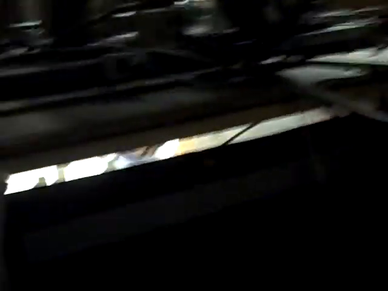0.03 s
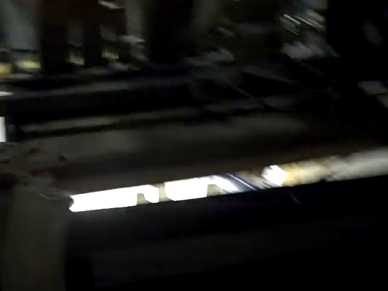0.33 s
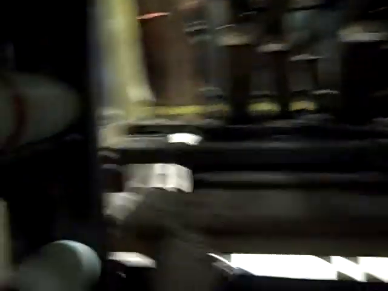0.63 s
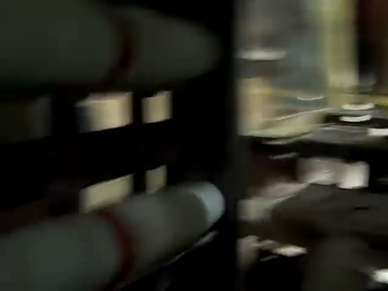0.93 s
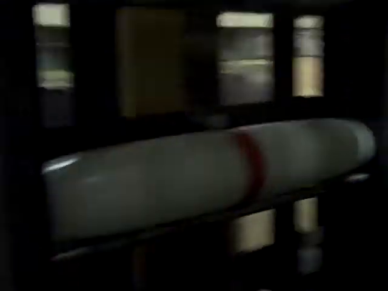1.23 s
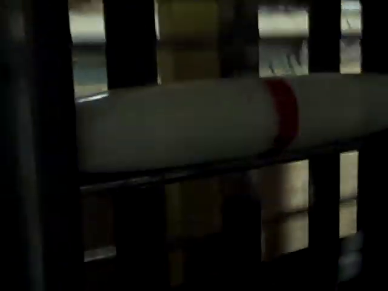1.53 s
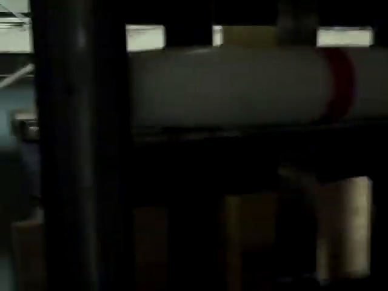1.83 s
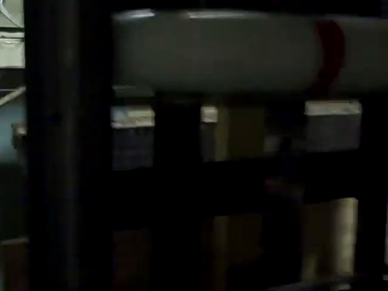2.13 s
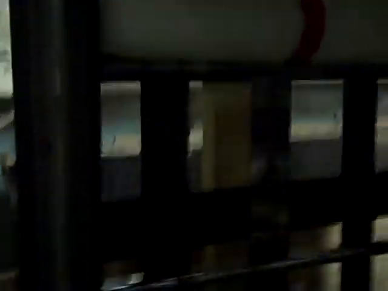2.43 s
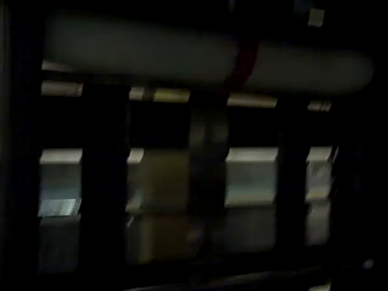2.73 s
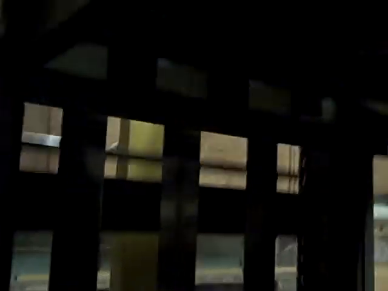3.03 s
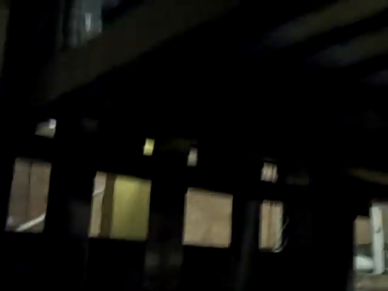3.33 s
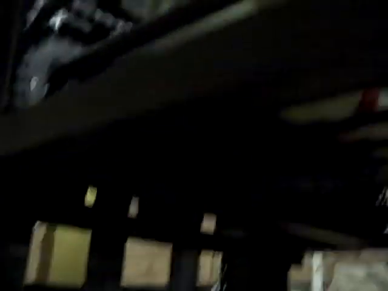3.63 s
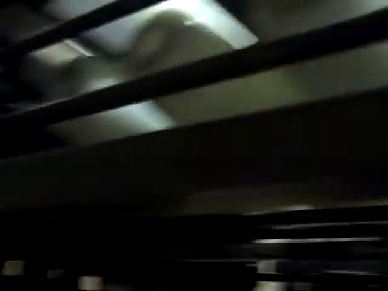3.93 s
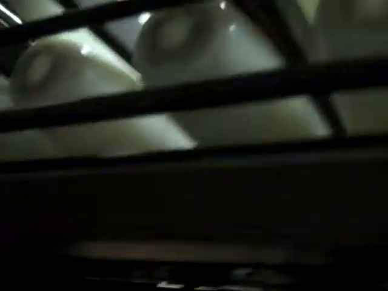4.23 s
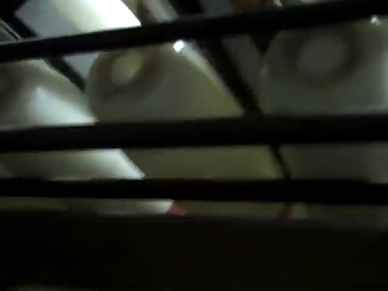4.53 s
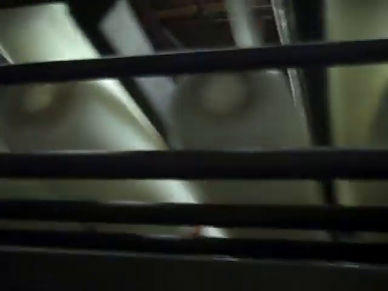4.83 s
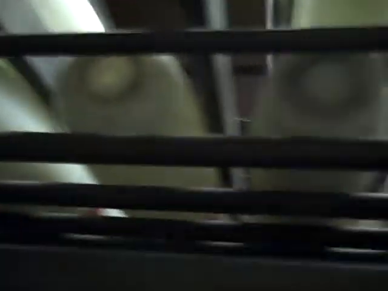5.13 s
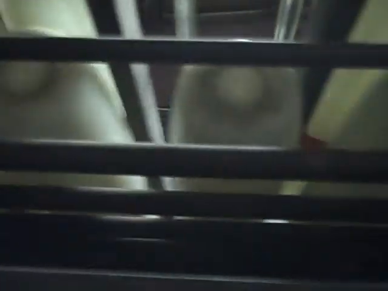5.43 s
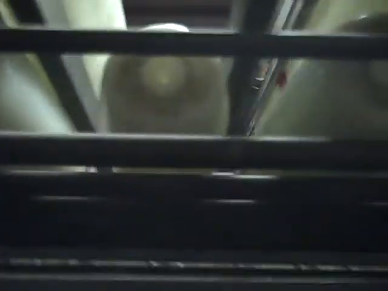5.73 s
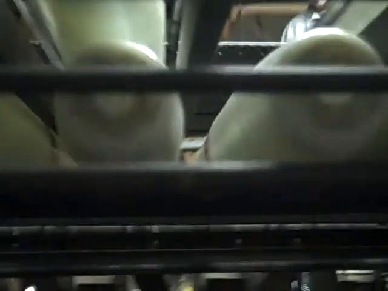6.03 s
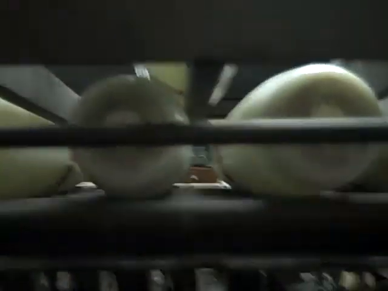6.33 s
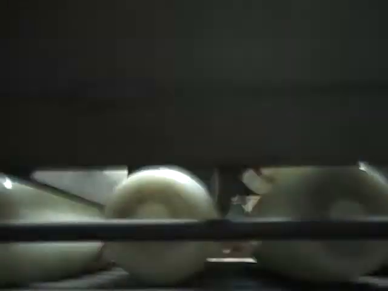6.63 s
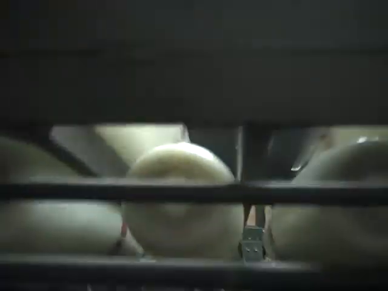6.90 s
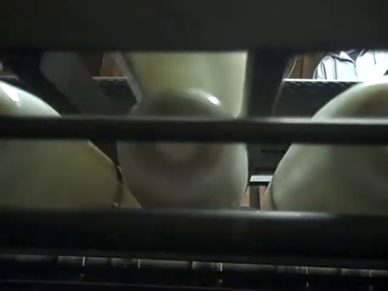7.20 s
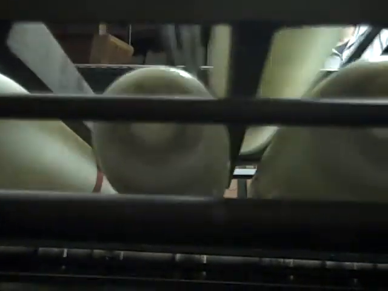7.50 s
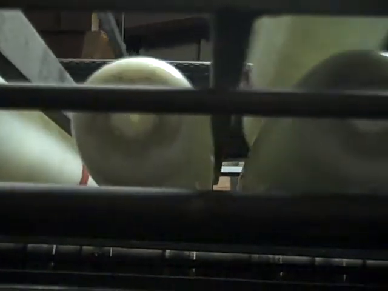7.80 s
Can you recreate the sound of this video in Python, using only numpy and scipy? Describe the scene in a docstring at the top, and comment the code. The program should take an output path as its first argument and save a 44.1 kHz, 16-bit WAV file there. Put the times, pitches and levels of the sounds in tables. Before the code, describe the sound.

A bowling pinsetter runs, heard close up from inside its housing. Over a steady motor hum and conveyor rumble, pins drop off a belt about twice a second with hard, hollow clatters, then bump and scrape down chutes and knock together. Chains and linkages rattle and click throughout. Three times, near the start, middle and end, a steel part slams with a brief ring.

```python
"""Inside a bowling pinsetter

The microphone sits in the running machine, over motor hum and conveyor rumble. About twice a second a
pin drops off the belt and clatters; between drops, pins bump down their chutes. Loose pins collide,
chains and linkages rattle, and three times a steel part slams and rings. The housing scatters the
blows, and fainter knocks come from deeper inside."""
import sys
import numpy as np
from scipy import signal
from scipy.fft import rfft, irfft, next_fast_len
from scipy.io import wavfile
from scipy.ndimage import uniform_filter1d, map_coordinates

SR = 44100
rng = np.random.default_rng(int(sys.argv[2]) if len(sys.argv) > 2 else 0)


def generate_wav(sig):
    """Save sig (samples, or channels by samples) to the path in sys.argv[1] as 16-bit PCM at SR."""
    pcm = np.round(np.clip(np.atleast_2d(sig).T, -1, 1) * 32767).astype(np.int16)
    wavfile.write(sys.argv[1], SR, pcm)


N = 355446

# steady hum: (time [s], relative level [dB])
HUM_LEVEL = [(0, -54), (.9, -51), (2.3, -48.5), (3.2, -48.5), (5.1, -49.5), (5.8, -53), (8.06, -54)]
# three motor tones, then a pin resonance near 629 Hz: (frequency [Hz], relative level [dB])
HUM_TONES = [(297, -24), (327, -6.5), (594, 4), (629, 2)]
# load on the belt: (time [s], relative level of rolling pins [dB], relative level of rumble [dB])
BELT_LOAD = [(0.0, -34.5, -48), (0.65, -37.5, -43.5), (0.83, -44, -47), (2.58, -35.5, -45),
             (2.78, -37, -42), (3.46, -37, -45), (3.57, -41, -48), (4.4, -41.5, -43.5), (4.51, -34, -45),
             (5.68, -44, -43.5), (6.53, -39.5, -46.5), (6.64, -36, -44), (6.96, -38, -44),
             (8.06, -39, -46.5)]
# the chain, which slackens after each slam: (time [s], relative level [dB])
CHAIN_EFFORT = [(0.0, -36.5), (0.47, -35.5), (0.72, -46), (1.32, -44), (1.48, -39.5), (1.82, -41),
                (2.36, -38), (2.83, -42), (3.25, -40), (3.46, -51.5), (3.93, -48.5), (4.71, -38.5),
                (5.16, -43.5), (6.02, -39), (6.46, -41.5), (7.59, -39.5), (7.81, -45.5), (8.06, -47.5)]
# reverberation of the housing: (frequency [Hz], t60 [s])
HOUSING_DECAY = [(100, 0.067), (600, 0.57), (1450, 0.55), (2400, 0.2), (4000, 0.48), (12000, 0.18)]

# noise colours of the running parts and of blows: (frequency [Hz], relative density [dB])
FRAME_RUMBLE = [(15, -68), (25, -38), (37, -82), (117, -19.5), (221, -15), (262, -5.5), (364, -6),
                (433, -9), (468, -6), (556, -11), (589, -3.5), (743, -10), (936, -8), (1230, -11.5),
                (2500, -48), (3250, -46), (5500, -120)]
FRAME_THUD = [(15, 0.5), (60, -9), (120, -8.5), (200, -9.5), (500, -9), (1200, -31), (4000, -80)]
CHAIN_HISS = [(800, -34), (1600, 3.5), (2800, 4), (4000, 1.5), (6000, -1.5), (8000, -4.5), (10000, -5.5),
              (12500, -13), (16000, -20.5)]
LINK_CLICK = [(1500, -16), (3000, -1), (5000, 0), (7000, -1.5), (10000, -2), (12500, -9), (14500, -14.5),
              (16000, -20)]
SHEET_CLANK = [(30, -36), (100, -18), (350, -3), (900, -2), (1700, 0), (2800, 0), (4000, -5), (7000, -14),
               (11000, -20), (16000, -34)]
PIN_ROLL = [(300, -53), (520, -12), (660, 3.5), (900, 1.5), (1150, -0.5), (1430, 5.5), (1750, -4.5),
            (2300, -0.5), (3200, -44)]
PIN_SCRAPE = [(250, -20), (500, 3.5), (660, 2.5), (850, 6), (1050, 9), (1450, -5.5), (1800, -3.5),
              (2300, -7), (3500, -22.5)]
PIN_CRACK = [(150, -28), (500, 1), (1500, 9.5), (3200, 6.5), (4500, -0.5), (6500, -11), (10000, -15),
             (16000, -27)]

# modes of a link, a guide rod, the steel part and a pin: (frequency [Hz], relative level [dB], t60 [s])
LINK_MODES = [(2710, 3, 0.07), (3540, -15, 0.048), (4380, -4, .03), (5160, -14, .06), (7800, -20, .05)]
ROD_MODES = [(7640, -11, 0.11), (8400, 6, .2), (8560, -5, 0.15), (10700, 1, .18), (12950, -12, .18)]
STEEL_MODES = [(2896, -1, .07), (3070, -5, .08), (3450, -3, .11), (4086, -5, .09), (4320, -7, .1),
               (4716, -5, .12), (5416, -5, .13), (6150, -2, .12), (6930, -1, .12), (7755, -7, .17),
               (8640, -9, .13), (9512, -3, .12), (10440, 3, .17), (11410, 8, .14), (12410, 8, .14)]
PIN_BODY_MODES = [(655, -8, 0.05), (712, -9, 0.033), (936, -7, 0.024)]
PIN_CLACK_MODES = [(1135, -15, 0.027), (1350, -6, 0.03), (1443, -2, 0.071), (1613, -5.5, 0.017)]
PIN_UPPER_MODES = [(1907, -6.5, 0.026), (2170, 2, 0.022), (2310, 3, 0.045), (2500, -12, 0.023)]

# the loudest chain and linkage clicks: (time [s], relative level [dB], clank offset [dB])
LOUD_CLICKS = [(0.0623, -18.5, -3.5), (0.1232, -21.5, -5), (0.2263, -20.5, 0.5), (0.2668, -17.5, -16),
               (0.295, -21.5, -3.5), (.3322, -21, -9), (.374, -19.5, -7), (0.4024, -18.5, -9),
               (1.295, -28.5, 3), (1.3492, -23, -3), (1.3982, -20.5, -1), (1.4703, -19.5, -2),
               (2.4947, -18.5, -3.5), (2.5636, -20.5, -7), (2.9996, -24, -5), (3.5874, -30, -11),
               (3.6632, -32, -6), (4.5329, -30.5, 4.5), (4.6764, -23, -2), (5.7666, -26.5, 3.5),
               (5.8422, -23.5, -2), (5.901, -26.5, 1), (6.0642, -25, 3), (6.2497, -25, -8),
               (6.4698, -21, -17), (6.9305, -27, -10), (7.4384, -20.5, -5.5), (7.4889, -25, -6),
               (7.6006, -19, -9), (7.645, -21, 2)]
# loose links chinking: (time [s], relative level [dB])
LINK_CHINKS = [(.297, -25.5), (.376, -27.5), (.418, -29), (2.496, -24), (3.589, -37), (4.679, -27),
               (5.77, -30.5), (7.442, -33), (7.492, -37)]
# the steel part slams and bounces, or a pin clips it: (time [s], relative level [dB], ring offset [dB])
STEEL_SLAMS = [(0.5964, -16.5, -6), (0.6025, -20, -1), (0.6208, -22.5, -7), (3.3168, -23, -2),
               (3.3346, -27, -11), (3.3407, -13.5, -5.5), (4.365, -28.5, -6), (5.6898, -33, -9),
               (7.6664, -15, -14), (7.6807, -16, -9.5)]
# pins grazing thin guide rods: (time [s], relative level [dB])
ROD_TINGS = [(4.064, -41), (5.166, -41), (5.412, -40), (5.446, -39), (5.518, -39), (5.69, -40),
             (5.972, -39)]
# jolts of the frame: (time [s], relative level [dB])
FRAME_JOLTS = [(0.297, -57), (0.603, -40), (1.402, -50), (2.497, -41), (2.596, -44), (3.341, -29.5),
               (7.682, -29)]
# pins going down a chute, levels relative: (middle [s], bump [dB], scrape [dB], half length [s])
CHUTE_SLIDES = [(0.756, -25, -35, 0.042), (1.336, -30, -38, .06), (1.862, -23.5, -37, 0.035),
                (2.422, -34, -40, 0.033), (4.0622, -18, -50, 0.047), (4.62, -20, -32.5, 0.021),
                (5.1584, -17, -35.5, 0.098), (5.6795, -13, -34, 0.059), (6.234, -13.5, -32.5, 0.051),
                (6.7523, -14.5, -35, 0.051), (7.3117, -16, -30.5, 0.056)]
# loose pins colliding: (time [s], relative level [dB], body offset [dB], hardness [dB])
PIN_COLLISIONS = [(.0034, -18.5, -13, 3), (.2423, -17.5, -16, -15), (0.596, -10.5, -9, 4.5),
                  (.6094, -6, -26, 2), (0.6821, -17, -18, 0), (2.395, -22.5, -21, -1),
                  (2.595, -4.5, -12.5, -0.5), (2.7875, -5, -22, -11), (2.8114, -21, -2, -9),
                  (3.0009, -20.5, -9.5, 3.5), (3.3037, -8.5, -26, 1), (3.3174, -9.5, -9, 2.5),
                  (3.3335, -6.5, -10.5, 5.5), (3.4358, -15, -17, 1), (3.5337, -22, -14, -8),
                  (3.704, -18, -9, 0), (4.4472, -21.5, -16, 2), (4.583, -12, -10, -5),
                  (4.784, -5.5, -14, -2.5), (5.2014, -23, -22, -5), (5.5149, -24, -9, 4),
                  (6.474, -22, -7, 0), (6.6656, -18, -11, -5), (7.673, -6.5, -11, 3),
                  (8.0293, -15.5, -12.5, 0)]
# a pin lands on one end, then the other, once a cycle; levels relative: (time [s], first contact [dB],
# gap [s], second contact [dB], rebound [dB], body offset [dB], hardness [dB], steel [dB])
PIN_DROPS = [(0.5168, -16, 0.02, -19, -18.5, -10.5, 4.5, -50), (1.0624, -24, 0.012, -13, -42, -13, -5, -55),
             (1.6048, -19, 0.013, -16, -30, -6, 0.5, -55), (2.147, -15, 0.0071, -13, -25, -10, 3, -33),
             (2.6923, -16, 0.0085, -15, -22, -11, 0.5, -50),
             (3.2533, -13.5, .009, -11.5, -15, -11.5, -7, -52),
             (3.8005, -13.5, 0.013, -22, -40, -13, -1, -57),
             (4.2993, -21.5, .011, -10.5, -14.5, -15, 3, -42), (4.8729, -13, 0.018, -7, -31, -12, 3, -46),
             (5.3992, -20, .0113, -16.5, -10.5, -15.5, 8, -34),
             (5.9464, -17.5, 0.021, -13, -22, -8, 6.5, -28),
             (6.5194, -13, 0.0099, -8.5, -18, -19, -0.5, -33),
             (7.0348, -10, .0246, -7.5, -14.5, -14, 3, -42),
             (7.5591, -21, 0.022, -11.5, -14, -14, 0.5, -35)]


def amp(db):
    """Decibels to amplitude."""
    return 10 ** (np.asarray(db) / 20)


def unit(x):
    """Scale to rms 1."""
    return x / np.sqrt(np.mean(x ** 2) + 1e-20)


def crest(x):
    """Scale a blow so that its loudest 4 ms have rms 1."""
    return x / np.sqrt(uniform_filter1d(x ** 2, 176).max() + 1e-20)


def along(points, hz):
    """Interpolate (frequency, value) points on a log axis."""
    knots_hz, values = np.transpose(points)
    return np.interp(np.log(hz + 1), np.log(knots_hz + 1), values)


def curves(rows):
    """One value per sample for each column after the time."""
    times, *columns = np.transpose(rows)
    return [np.interp(np.arange(N) / SR, times, column) for column in columns]


def wobble(rate):
    """A smooth random curve, rate knots a second."""
    knots = rng.standard_normal(int(N * rate / SR) + 4)
    return map_coordinates(knots, [np.arange(N) * rate / SR])


def uneven(gap):
    """A gap that comes out a little long or short."""
    return gap * (1 + .05 * rng.standard_normal())


def noise(spectrum, size):
    """Coloured noise of rms 1."""
    padded = next_fast_len(size)
    colour = amp(along(spectrum, np.fft.rfftfreq(padded, 1 / SR)))
    return unit(irfft(rfft(rng.standard_normal(padded)) * colour, padded)[:size])


def blow_time():
    """The time axis of one blow, 0.3 s long."""
    return np.arange(13230) / SR


def add(track, at, sound):
    """Mix a sound into the track at a time in seconds."""
    start = int(np.clip(round(at * SR), 0, N - 1))
    track[start:start + len(sound)] += sound[:N - start]


def high_pass(x, cut_hz):
    """Small parts radiate no deep bass."""
    return signal.sosfilt(signal.butter(3, cut_hz, "highpass", fs=SR, output="sos"), x)


def ring(modes, scatter_db, pitch=1, detune=0):
    """Damped modes, each struck with a new strength and, with detune, a little out of tune."""
    t = blow_time()
    hz, db, t60 = np.transpose(modes)[:, :, None]
    hz = hz * (pitch + detune * rng.standard_normal(hz.shape))
    gain = amp(db + scatter_db * rng.standard_normal(hz.shape)) * rng.choice([-1, 1], hz.shape)
    return np.sum(gain * amp(-60 * t / t60) * np.sin(2 * np.pi * hz * t), axis=0)


def burst(spectrum, attack, t60, tail_db, tail_t60):
    """A contact too dense in modes to have a pitch: a fast decay plus a slower one."""
    t = blow_time()
    decay = amp(-60 * t / t60) + amp(tail_db - 60 * t / tail_t60)
    return crest(noise(spectrum, len(t)) * (1 - np.exp(-t / attack)) * decay)


def chatter(rate, spread_db, t60):
    """Envelope of many small, unevenly spaced contacts, rms 1."""
    count = int(rate * N / SR)
    delay, strength = rng.random((count, 2)).T
    starts = ((np.arange(count) + delay) * N / count).astype(int)
    hits = np.bincount(starts, amp(spread_db * (2 * strength - 1)) ** 2, N)
    power = signal.fftconvolve(hits, amp(-60 * blow_time() / t60) ** 2)[:N]
    return unit(np.sqrt(np.abs(power)))


def housing(blow, near_db, near_t60, far_db):
    """A blow at the microphone, scaled by crest: direct, off nearby steel, and off the far enclosure."""
    t = blow_time()
    near = rng.standard_normal(len(t)) * amp(-60 * t / near_t60) * (t > .002)
    hz, times, bands = signal.stft(rng.standard_normal(len(t)), SR, nperseg=256)
    bands *= amp(-60 * times / along(HOUSING_DECAY, hz)[:, None])
    far = signal.istft(bands, SR, nperseg=256)[1][:len(t)] * (t > .008)
    echo = amp(near_db) * near / np.linalg.norm(near) + amp(far_db) * far / np.linalg.norm(far)
    return crest(blow + signal.fftconvolve(blow, echo)[:len(t)])


def hum():
    """Motor tones at 297, 327 and 594 Hz and a pin resonance near 629 Hz, all wavering slightly."""
    level_db, = curves(HUM_LEVEL)
    clock = np.cumsum(1 + .004 * wobble(10)) / SR
    return sum(amp(level_db + db - 1 + 2.5 * wobble(7)) * np.sin(2 * np.pi * hz * clock)
               for hz, db in HUM_TONES)


def conveyor():
    """The frame rumbles, pins roll and jostle on the belt, and the chains run with a fine rattle."""
    roll_db, rumble_db = curves(BELT_LOAD)
    chain_db, = curves(CHAIN_EFFORT)
    rumble = amp(rumble_db + 4.5 + .32 * wobble(14)) * noise(FRAME_RUMBLE, N)
    roll = amp(roll_db - 2.5) * noise(PIN_ROLL, N) * chatter(rate=70, spread_db=8, t60=.14)
    hiss = amp(chain_db - 1.6) * noise(CHAIN_HISS, N)
    rattle = amp(chain_db - 1.5) * noise(CHAIN_HISS, N) * chatter(rate=55, spread_db=4, t60=.12)
    return rumble + roll + hiss + rattle


def link_click(db, clank_db):
    """A loose link clicks against its guide and clanks the sheet metal."""
    click = burst(LINK_CLICK, attack=.0015, t60=.022, tail_db=-3, tail_t60=.13)
    clank = burst(SHEET_CLANK, attack=.0015, t60=.083, tail_db=-17, tail_t60=.23)
    return amp(db) * (amp(-8.5) * click + amp(clank_db - 5) * clank)


def linkages(ticks_per_s=8):
    """Loud clicks and chinks stand out from random lesser ticks that follow the chain's effort."""
    out = np.zeros(N)
    for at, db, clank_db in LOUD_CLICKS:
        add(out, at, link_click(db, clank_db))
    for at, db in LINK_CHINKS:
        add(out, at, amp(db) * crest(ring(LINK_MODES, scatter_db=2, detune=.012)))
    count = int(ticks_per_s * N / SR)
    for k in range(count):
        at = (k + rng.random()) / count * N / SR
        chain_db = np.interp(at, *np.transpose(CHAIN_EFFORT))
        add(out, at, link_click(chain_db + 14, clank_db=-13))
    return high_pass(out, cut_hz=54)


def steel_blow(db, ring_db):
    """Steel is struck and rings; a softer contact hardly reaches the modes above 10 kHz."""
    top_db = -23.5 + .55 * (db + 20)
    modes = [(hz, level + top_db * (hz > 10000), t60) for hz, level, t60 in STEEL_MODES]
    ringing = housing(ring(modes, scatter_db=2), near_db=-9, near_t60=.019, far_db=-14)
    crash = burst(LINK_CLICK, attack=.001, t60=.074, tail_db=-18, tail_t60=.2)
    return amp(db) * (amp(-10) * crash + amp(ring_db) * ringing)


def slams():
    """The steel part slams, thin rods ting, and heavy blows jolt the frame."""
    steel, frame = np.zeros((2, N))
    for at, db, ring_db in STEEL_SLAMS:
        add(steel, at, steel_blow(db, ring_db))
    for at, db in ROD_TINGS:
        add(steel, at, amp(db - 7) * crest(ring(ROD_MODES, scatter_db=3, detune=.003)))
    for at, db in FRAME_JOLTS:
        thud = burst(FRAME_THUD, attack=.0025, t60=.041, tail_db=-29, tail_t60=.61)
        add(frame, at, amp(db + 3.5) * thud)
    return high_pass(steel, cut_hz=200) + frame


def chute_scrapes():
    """Each pin scrapes down its chute in a short grainy swell."""
    t = np.arange(N) / SR
    swell = sum(amp(db) * np.exp(-((t - middle) / half) ** 2) for middle, _, db, half in CHUTE_SLIDES)
    return swell * noise(PIN_SCRAPE, N) * chatter(rate=90, spread_db=4, t60=.16)


def pin_knock(db, body_db, hard_db):
    """Each contact rings a slightly different pin; a harder one has more upper modes and crack."""
    pitch = 1 + .0089 * rng.standard_normal()
    wet_db = -.4 * (db + 10)  # fainter knocks lie further from the microphone: more reflection
    body = ring(PIN_BODY_MODES, scatter_db=5.5, pitch=pitch, detune=.047)
    body = housing(body, near_db=wet_db + 1.5, near_t60=.14, far_db=-9)
    clack = ring(PIN_CLACK_MODES, scatter_db=2, pitch=pitch, detune=.021)
    clack = housing(clack, near_db=wet_db - 2.5, near_t60=.065, far_db=-12)
    upper = ring(PIN_UPPER_MODES, scatter_db=3, pitch=pitch, detune=.012)
    upper = housing(upper, near_db=wet_db - 3, near_t60=.084, far_db=-8)
    crack = burst(PIN_CRACK, attack=.0016, t60=.13, tail_db=3, tail_t60=.16)
    edge = amp(-11) * upper + amp(-15.5) * crack
    return amp(db) * (amp(-7) * clack + amp(body_db - 1.5) * body + amp(hard_db) * edge)


def pin_drops(flight_s=.023, loss_db=7):
    """Each pin lands twice on its steel guide, then rebounds twice, more weakly the second time."""
    out = np.zeros(N)
    for start, first_db, gap, second_db, rebound_db, body_db, hard_db, steel_db in PIN_DROPS:
        for at, db in (start, first_db), (start + gap, second_db):
            add(out, at, pin_knock(db, body_db, hard_db))
            add(out, at, steel_blow(steel_db, ring_db=-2))
        for k in range(2):
            at = start + gap + uneven(flight_s * (k + 1))
            add(out, at, pin_knock(rebound_db - loss_db * k, body_db, hard_db - 5.5))
    return out


def pins(bump_gap_s=.027):
    """Pins drop, bump down the chutes in swelling and fading runs of five, and collide."""
    out = pin_drops()
    for middle, bump_db, _, half in CHUTE_SLIDES:
        for k in range(-2, 3):
            offset = uneven(bump_gap_s * k)
            db = bump_db - 13.5 * (offset / half) ** 2
            add(out, middle + offset, pin_knock(db, body_db=-13, hard_db=-2.5))
    for at, db, body_db, hard_db in PIN_COLLISIONS:
        add(out, at, pin_knock(db, body_db, hard_db))
    return high_pass(out, cut_hz=295)


def scene():
    """The whole machine at one microphone inside the housing."""
    return (pins() + chute_scrapes() + linkages() + slams() + conveyor() + hum())[None]


def record(dry):
    """The recorder rounds off the highest peaks and keeps nothing above its band limit."""
    ceiling, top_hz = .75, 15780
    rounded = dry / (1 + np.abs(dry / ceiling) ** 6) ** (1 / 6)
    padded = next_fast_len(N + SR // 2)
    in_band = np.fft.rfftfreq(padded, 1 / SR) < top_hz
    return irfft(rfft(rounded, padded) * in_band, padded)[..., :N]


dry = scene()
out = record(dry)
generate_wav(out)
```